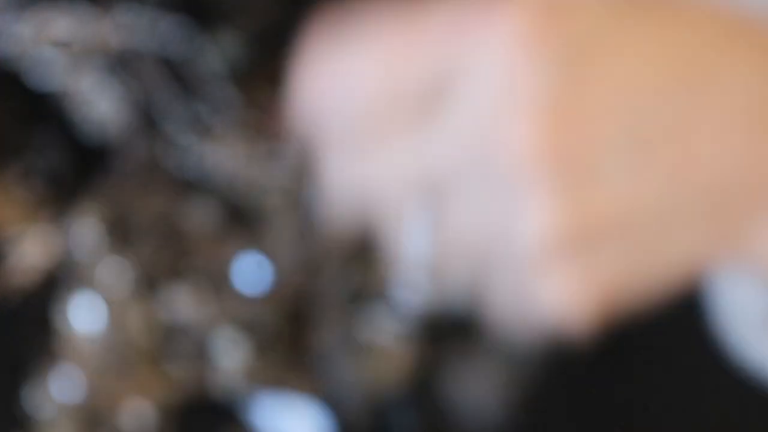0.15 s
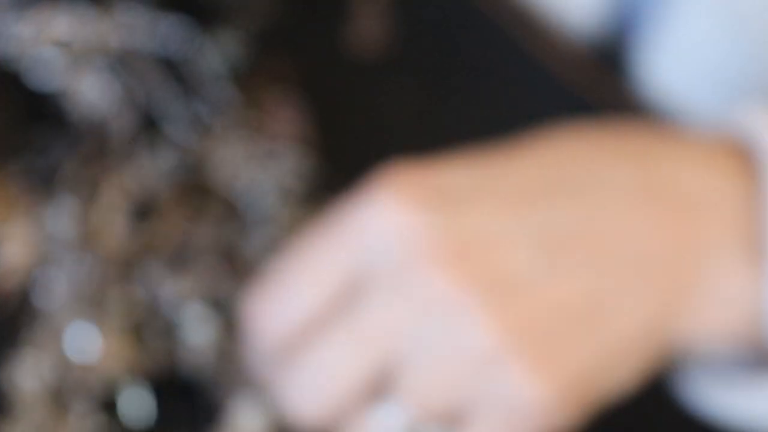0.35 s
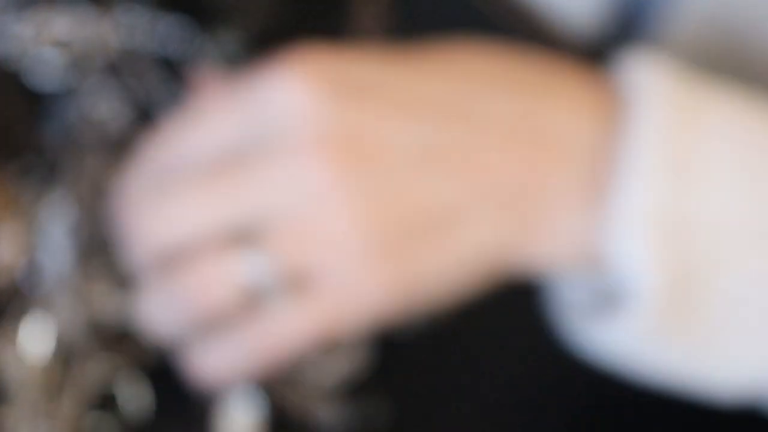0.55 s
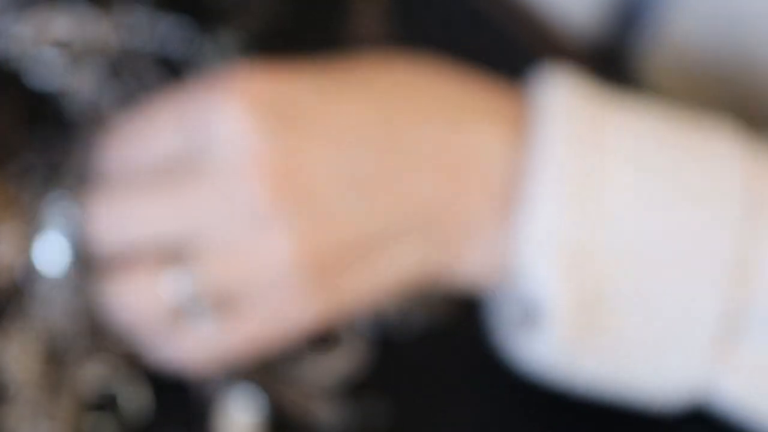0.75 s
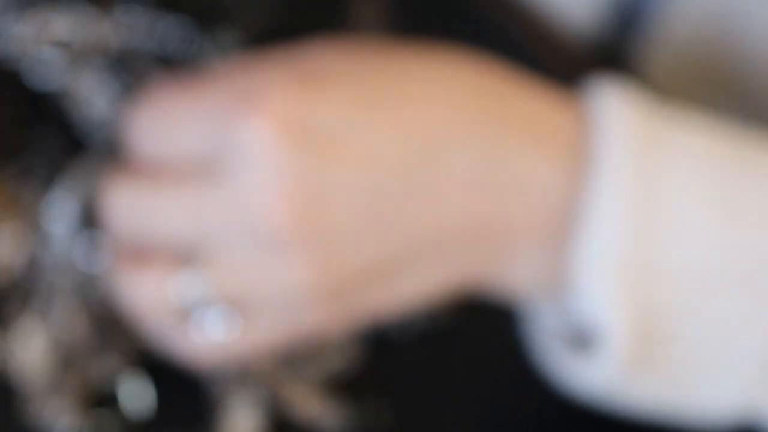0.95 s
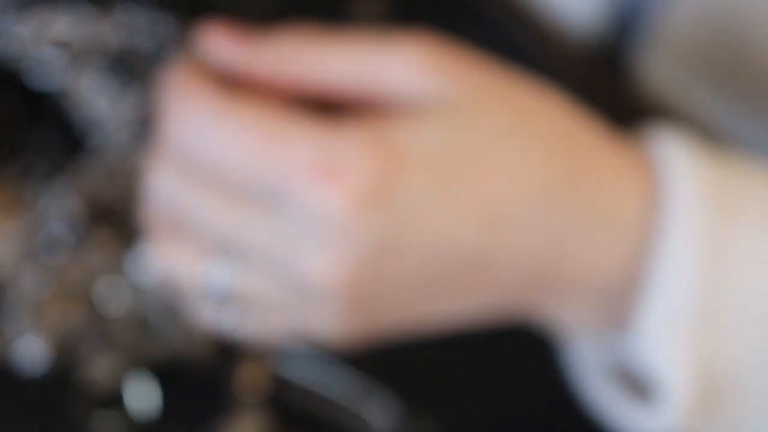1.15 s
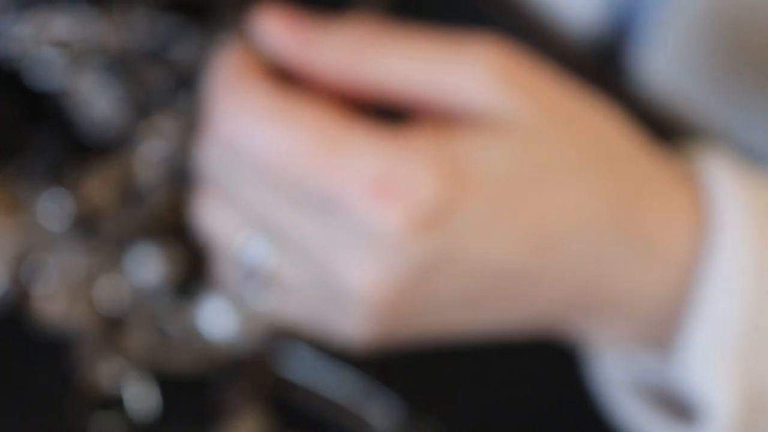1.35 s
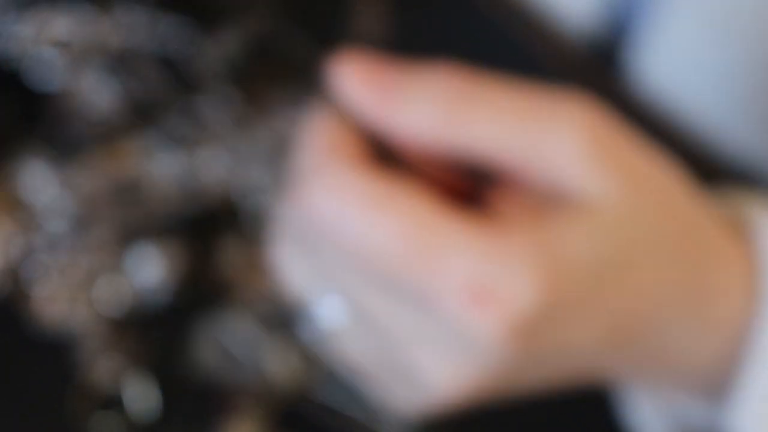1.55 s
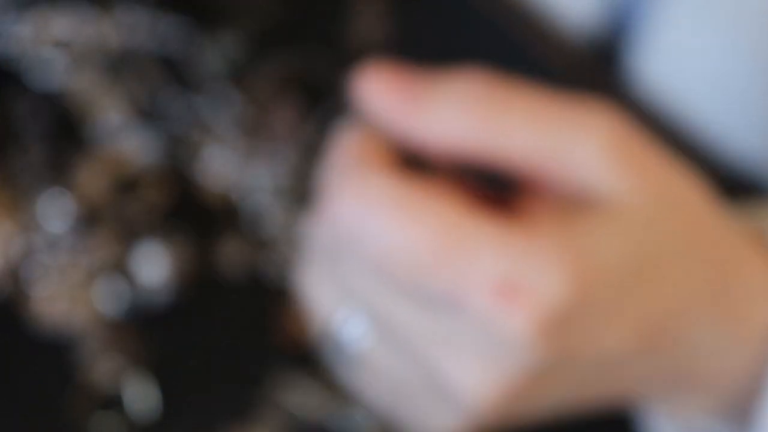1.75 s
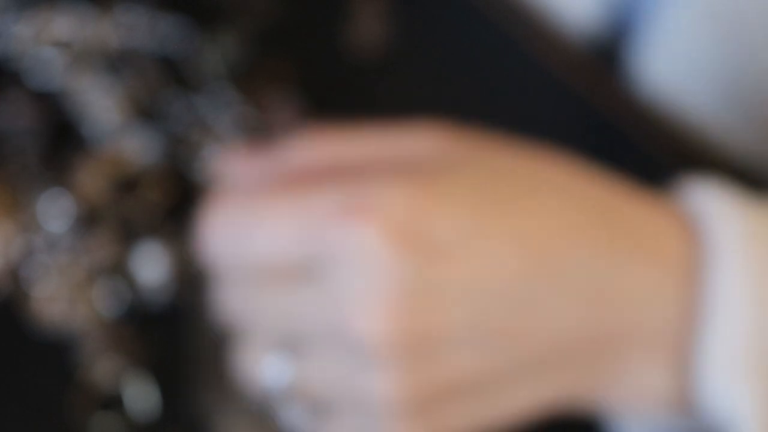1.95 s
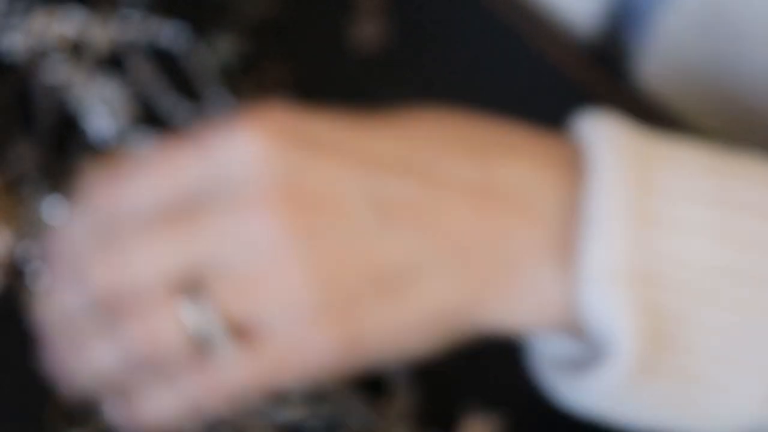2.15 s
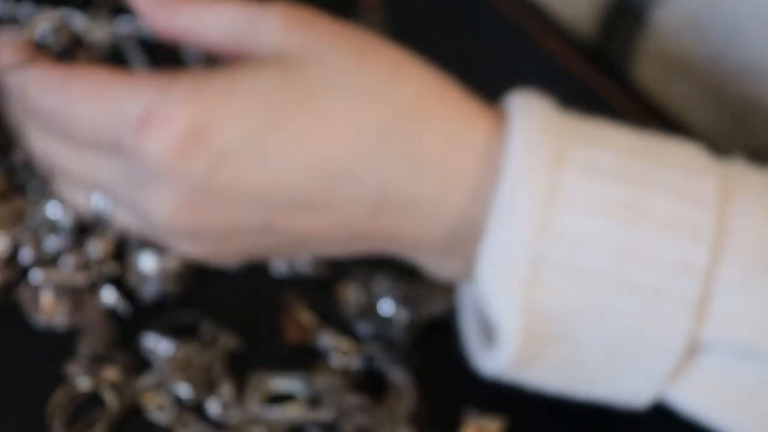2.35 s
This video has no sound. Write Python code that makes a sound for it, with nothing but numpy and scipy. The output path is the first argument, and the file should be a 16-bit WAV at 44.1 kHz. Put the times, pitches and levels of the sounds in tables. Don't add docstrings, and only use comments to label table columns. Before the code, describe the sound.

A hand stirs chains and earrings, bright metallic rattling with dull thuds on a tabletop

```python
import sys
import numpy as np
from scipy import signal
from scipy.fft import rfft, irfft, next_fast_len
from scipy.io import wavfile
from scipy.ndimage import map_coordinates

SR = 44100
rng = np.random.default_rng(int(sys.argv[2]) if len(sys.argv) > 2 else 0)


def waveform_to_disk(signal):
    frames = np.transpose(np.atleast_2d(signal))
    scaled = np.clip(frames, -1, 1) * 32767
    samples = np.round(scaled).astype(np.int16)
    wavfile.write(sys.argv[1], SR, samples)


def convert_level_to_amplitude(level_db):
    exponent = np.asarray(level_db, float) / 20
    return 10 ** exponent


N = 110250

# start_s [s], peak_db [dB], brightness_db [dB]
CLACKS = [(0.046, -33, 13.5), (0.098, -36, 19.5), (0.166, -25.5, 6), (0.203, -11, 7.5),
          (0.3154, -11.5, -15), (0.3413, -5.5, -13), (0.534, -19, 5.5), (0.848, -25, -13),
          (0.8635, -26, -21), (0.967, -26.5, -5), (1.037, -21.5, 0), (1.0652, -14.5, -12),
          (1.1707, -32, -16), (1.1955, -7, -3), (1.3004, -15, -7), (1.4149, -25.5, 5), (1.5374, -46, -15),
          (1.6178, -23, -8), (1.6771, -10, 2), (1.6808, -7, -4), (1.7462, -9.5, -13), (1.8152, -33, 10),
          (1.858, -35, -26), (1.9722, -15, 2), (2.0007, -11, 1), (2.0345, -6, -32), (2.0892, -33, -19),
          (2.1016, -12, -32), (2.1172, -3, -30), (2.2356, -9, 1)]
# start_s [s], peak_db [dB], hardness_hz [Hz]
KNOCKS = [(0.2386, -2.5, 1780), (0.2759, -4, 1660), (0.343, -9, 2500), (0.383, -17.5, 2500),
          (0.761, -34.5, 2970), (1.147, -27.5, 1010), (1.171, -17, 910), (1.525, -31.5, 900),
          (1.974, -27, 516), (2.035, -26, 890), (1.69, -49, 2000)]
# frequency_hz [Hz], density_db [dB per Hz]
LINK_COLOUR = [(710, -13.5), (1200, -11), (1720, -25.5), (1950, -3), (5590, -7.5), (8350, -2.5),
               (14500, -13.5), (16000, -3)]

LAG_S, PAN_DB, TOP_LAG_S = 0.0001, 4, 0.00006
CLATTER_TOP_HZ = 3120


def unit(x):
    return x / np.sqrt(np.mean(x ** 2) + 1e-20)


def along(points, hz):
    f, v = np.transpose(points)
    return np.interp(np.log(hz + 1), np.log(f + 1), v)


def wobble(rate):
    knots = rng.standard_normal(int(N * rate / SR) + 4)
    return map_coordinates(knots, [np.arange(N) * rate / SR])


def filtered(x, response):
    m = next_fast_len(N + SR // 2)
    return irfft(rfft(x, m) * response(np.fft.rfftfreq(m, 1 / SR)), m)[..., :N]


def causal(points):
    def response(hz):
        cepstrum = irfft(np.log(convert_level_to_amplitude(along(points, hz)) + 1e-6))
        half = len(cepstrum) // 2
        cepstrum[1:half] *= 2
        cepstrum[half + 1:] = 0
        return np.exp(rfft(cepstrum))
    return response


def pings(s, hz, db, t60, lag_s, size, pan_db=PAN_DB):
    t = np.arange(size) / SR
    place = rng.standard_normal((len(s), 2))
    out = []
    for side in (-0.5, 0.5):
        at = (s + side * lag_s * place[:, 0]) * SR
        age = np.maximum(t - (at % 1)[:, None] / SR, 0)
        level_db = (db + side * pan_db * place[:, 1])[:, None] - 60 * age / t60[:, None]
        wave = convert_level_to_amplitude(level_db) * np.sin(2 * np.pi * hz[:, None] * age)
        i = np.clip(np.floor(at).astype(int)[:, None] + np.arange(size), 0, N)
        out.append(np.bincount(i.ravel(), wave.ravel(), N + 1)[:N])
    return np.array(out)


def contacts(count, spread_db, lag_s):
    d = rng.random((count, 2))
    one = np.ones(count)
    size_db = spread_db * np.minimum(-np.log(d[:, 1]), 4)
    pan_db = PAN_DB * (lag_s / LAG_S) ** 2
    clicks = pings(d[:, 0] * N / SR, one * SR / 4, size_db, one * 3 / SR, lag_s, size=4, pan_db=pan_db)
    return unit(clicks)


def air():
    # frequency_hz [Hz], density_db [dB per Hz]
    air_colour = [(15, -66), (25, -42), (64, -11), (117, -4.5), (427, -11.5), (503, -6.5), (3340, -18),
                  (6210, -18), (16000, -25)]
    a, b = rng.standard_normal((2, N))
    pair = np.array([a + 0.93 * b, a - 1.18 * b])
    tone = unit(filtered(pair, lambda f: convert_level_to_amplitude(along(air_colour, f))))
    hiss = rng.standard_normal((2, N))
    rumble = unit(filtered(hiss, lambda f: f / (15 + f) / (1 + (f / 50) ** 3)))
    return convert_level_to_amplitude(-53.5) * (tone + convert_level_to_amplitude(-22) * rumble)


def room(x):
    # frequency_hz [Hz], t60_s [s]
    room_decay = [(200, 0.26), (2000, 0.28), (12000, 0.15)]
    hz, t, z = signal.stft(rng.standard_normal((2, SR // 3)), SR, nperseg=256)
    share = (1 / (1 + (hz / 1200) ** 2))[:, None]
    z = np.array([z[0], share * z[0] + np.sqrt(1 - share ** 2) * z[1]])
    decay = convert_level_to_amplitude(-60 * t / along(room_decay, hz)[:, None])
    tail = signal.istft(z * decay, SR, nperseg=256)[1]
    late = np.pad(x.mean(0), (130, 0))[None]
    return signal.fftconvolve(late, tail / np.linalg.norm(tail[0]), axes=1)[:, :N]


def table(force):
    # frequency_hz [Hz], density_db [dB per Hz]
    top_colour = [(24, -69), (40, -28), (155, -4), (362, -5.5), (470, 2.5), (587, -4), (973, -3.5),
                  (1290, -8.5), (5000, -18), (6500, -22.5), (11000, -120)]
    # pitch_hz [Hz], width_hz [Hz], level_db [dB]
    top_modes = [(163.7, 12.7, 9), (206, 28, -5.5), (299, 50, 4.5), (464, 21, -3), (498, 28.5, 5),
                 (975, 106, 3), (1363, 215, 2.5), (2000, 400, -11.5)]
    colour = causal(top_colour)

    def response(f):
        modes = 1
        for centre, width, db in top_modes:
            modes = modes + convert_level_to_amplitude(db) * 1j * f * width / (centre * centre - f * f + 1j * f * width)
        return colour(f) * modes
    return filtered(force, response)


def thumps():
    # start_s [s], peak_db [dB], pitch_hz [Hz]
    thump_hits = [(0.202, -31, 526), (0.237, -22, 501), (0.275, -23.5, 500), (1.037, -37.5, 499),
                  (1.088, -33, 530), (1.136, -34, 524), (1.166, -28, 493), (1.207, -28, 481),
                  (1.239, -33.5, 508), (1.292, -39, 531), (1.708, -32.5, 514), (1.784, -35, 473),
                  (1.972, -27, 482.6), (1.984, -31, 501), (1.998, -27.5, 461), (2.035, -28.5, 490),
                  (2.079, -44, 460), (2.121, -28.5, 502)]
    s, db, hz = np.transpose(thump_hits)
    one = np.ones(len(s))
    boom = pings(s, 162.7 * one, db - 4.5, 0.14 * one, TOP_LAG_S, size=9000, pan_db=-2.0)
    return boom + pings(s, hz, db, 0.097 * one, TOP_LAG_S, size=5000, pan_db=-1.0)


def knocks():
    double_s = 0.0019
    s, db, hz = np.tile(np.transpose(KNOCKS), 2)
    s = s + double_s * (np.arange(len(s)) >= len(KNOCKS))
    blows = pings(s, hz, db + 3, 2.15 / hz, TOP_LAG_S / 2, size=200, pan_db=3)

    def soft(f):
        ratio = f / CLATTER_TOP_HZ
        return 1 / (1 - ratio ** 2 + 1.3j * ratio) ** 2
    return filtered(blows + convert_level_to_amplitude(-18) * table(blows), soft)


def pendants():
    # start_s [s], pitch_hz [Hz], level_db [dB], t60_s [s]
    pendant_rings = [(.077, 7360, -46, .1), (.105, 13390, -54, .1), (.2035, 7359, -14, .05),
                     (.243, 13400, -35, .2), (.27, 13400, -37, .12), (.44, 14900, -41, .1),
                     (.517, 6935, -31, .14), (.537, 13270, -36, .08), (.712, 6935, -45, .2),
                     (1.075, 8100, -35, .06), (1.101, 10085, -28, .08), (1.3, 6935, -36, .14),
                     (1.416, 7390, -34, .05), (1.464, 8620, -43, .08), (1.538, 7390, -43, .05),
                     (1.619, 7350, -36, .12), (1.62, 11110, -45, .15), (1.62, 9740, -47, .15),
                     (1.652, 7350, -28, .04), (1.663, 11780, -31, .4), (1.68, 12030, -27, .25),
                     (1.755, 11800, -42, .15), (1.808, 12750, -36, .1), (1.865, 14900, -47, .12),
                     (2.034, 8500, -23, .03), (2.045, 8600, -30, .07), (1.6803, 3700, -8, .005),
                     (2.2362, 3050, -26, .012), (.663, 6935, -55, .15), (.83, 6930, -48, .06),
                     (.544, 7600, -36, .03), (1.558, 10000, -47, .06), (1.578, 10000, -46, .05),
                     (1.235, 10000, -39, .1), (1.125, 13300, -43, .12), (1.485, 8700, -42, .05)]
    s, hz, db, t60 = np.transpose(pendant_rings)
    return pings(s, hz, db, t60, 0.000015, size=12000, pan_db=7)


def snaps():
    # start_s [s], peak_db [dB]
    snap_hits = [(0.0319, -39), (0.0471, -33), (0.0993, -30), (0.1675, -29), (0.186, -30), (0.2033, -7),
                 (0.2388, -9), (0.2776, -8), (0.3262, -18), (0.3418, -12), (0.3481, -13), (0.3592, -14),
                 (0.3895, -16), (0.4795, -21), (0.4997, -23), (0.5366, -20), (0.6398, -38), (0.7621, -36),
                 (0.8484, -29), (0.8633, -28), (0.91, -37), (1.0378, -26), (1.0779, -22), (1.0886, -24),
                 (1.1365, -25), (1.1497, -24), (1.1964, -16), (1.2757, -25), (1.3011, -18), (1.3337, -26),
                 (1.4167, -25), (1.5054, -32), (1.5261, -28), (1.5893, -27), (1.6198, -25), (1.6802, -4),
                 (1.7082, -16), (1.7274, -18), (1.7354, -21), (1.7455, -15), (1.7541, -17), (1.7592, -17),
                 (1.7724, -19), (1.787, -21), (1.816, -22), (1.8326, -25), (1.8396, -25), (1.8864, -25),
                 (1.9188, -28), (1.9687, -21), (1.9845, -19), (2.0354, -11), (2.0904, -21), (2.1034, -15),
                 (2.108, -17), (2.1173, -10), (2.1271, -14), (2.2378, -15)]
    mirror_s, mirror_db = 0.00018, -8
    s, db = np.transpose(snap_hits)
    one = np.ones(len(s))
    d = rng.random((len(s), 2, 4))
    push = pings(s, one * 5200, db + 5.5, one * 0.0005, 0.00002, size=40, pan_db=1)
    after_s = (s[:, None] + 0.0025 * d[:, 0]).ravel()
    after_hz = 2000 * 5 ** d[:, 1].ravel()
    after_db = np.repeat(db - 18, 4)
    after = pings(after_s, after_hz, after_db, np.full(len(after_s), 0.005), LAG_S, size=300)
    mirrored = filtered(push, lambda f: 1 - convert_level_to_amplitude(mirror_db) * np.exp(-2j * np.pi * f * mirror_s))
    return mirrored + after


def clacks():
    s, peak, bright = np.transpose(CLACKS)
    d = rng.random((len(s), 3, 12))
    hz = 1800 * (15000 / 1800) ** ((np.arange(12) + d[:, 0]) / 12)
    tilt_db = 0.58 * (bright + 8)[:, None] * np.log2(hz / 4000).clip(0)
    db = (peak - 8 - 18.0)[:, None] + tilt_db + 6 * d[:, 1]
    mode_s = s[:, None] + 0.0013 * d[:, 2] ** 2
    t60 = 0.014 + 15 / hz
    crack = pings(mode_s.ravel(), hz.ravel(), db.ravel(), t60.ravel(), LAG_S, size=800)
    one = np.ones(len(s))
    tap = pings(s, one * 2000, peak - 9, one * 0.0004, TOP_LAG_S, size=80)
    return crack + table(tap)


def stirring():
    # start_s [s], strength_db [dB], finest_links_db [dB]
    stir_moves = [(0, -52.5, 2), (.19, -49.5, 1), (.3, -33.5, 0), (.37, -19.5, -9.5), (0.539, -30, -7),
                  (.63, -56.5, -1), (1.0, -47, -10), (1.07, -37.5, 1.5), (1.22, -27.5, -4), (1.39, -44, -1),
                  (1.49, -46, 9.5), (1.575, -42.5, -3.5), (1.76, -27.5, -2.5), (1.92, -34, -6),
                  (2.02, -29, 2), (2.135, -25, -12), (2.195, -42, 5), (2.33, -63, -20)]
    # start_s [s], weight_db [dB]
    press_moves = [(0.0, -49.5), (0.19, -37), (0.24, -24), (0.33, -41.5), (0.35, -27), (0.69, -54),
                   (0.97, -46), (1.2, -30), (1.38, -47.5), (1.66, -40.5), (1.68, -36.5), (1.92, -41.5),
                   (1.98, -29.5), (2.14, -40), (2.21, -63), (2.24, -35.5), (2.32, -73), (2.5, -64)]
    t = np.arange(N) / SR
    s, db, fine_db = np.transpose(stir_moves)
    clump = 2.5 * wobble(30.48)
    level = convert_level_to_amplitude(np.interp(t, s, db) - 2 + clump + 0.94 * wobble(60))
    press_db = np.interp(t, *np.transpose(press_moves))
    heavy = convert_level_to_amplitude(press_db - 2 + 0.13 * clump + 1.2 * wobble(25.21))

    def dying(at, db, t60):
        return (t > at) * convert_level_to_amplitude(db - 60 * np.abs(t - at) / t60)
    for at, peak, _ in CLACKS:
        level = np.hypot(level, dying(at, peak - 14, 0.16))
    rattle = np.sqrt(sum(dying(at, peak - 11.5, 0.067) ** 2 for at, peak, _ in KNOCKS))
    return level, convert_level_to_amplitude(np.interp(t, s, fine_db)), heavy, rattle


def grains(count, spread_db, cycles):
    d = rng.random((count, 4))
    hz = 1500 * (16000 / 1500) ** d[:, 1]
    size_db = spread_db * np.minimum(-np.log(d[:, 2]), 3.5)
    db = size_db + along(LINK_COLOUR, hz) + 20 * np.log10(hz / 4000)
    t60 = cycles * (0.5 + d[:, 3]) / hz
    return unit(pings(d[:, 0] * N / SR, hz, db, t60, LAG_S, size=160))


def tinkling(level):
    d = rng.random((700, 4))
    hz = 4000 * (15000 / 4000) ** d[:, 1]
    s = d[:, 0] * N / SR
    stir_db = 20 * np.log10(level[(s * SR).astype(int)])
    db = stir_db + 2.0 * np.minimum(-np.log(d[:, 2]), 2.5) - 10
    return pings(s, hz, db, 0.0062 + 0.065 * d[:, 3] ** 2, LAG_S, size=2000)


def drumming(heavy, rattle):
    force = contacts(count=6000, spread_db=2.5, lag_s=TOP_LAG_S)
    return table(force * (heavy + 0.35 * rattle)) / np.std(table(force))


def clattering(rattle):
    def band(f):
        ratio = f / CLATTER_TOP_HZ
        return 1j * f / (1020 + 1j * f) / (1 - ratio ** 2 + 1.2j * ratio) ** 3
    beads = contacts(count=14000, spread_db=2.5, lag_s=LAG_S)
    return filtered(beads * rattle, band) / np.std(filtered(beads, band))


def chains():
    level, fine, heavy, rattle = stirring()
    ticks = contacts(count=12000, spread_db=3, lag_s=LAG_S)
    ticks = unit(filtered(ticks, causal(LINK_COLOUR)))
    links = convert_level_to_amplitude(-8.5) * ticks + convert_level_to_amplitude(-2.5) * grains(count=12000, spread_db=4.5, cycles=12.5)
    finest = filtered(links, lambda f: 1 / (1 + (7300 / (f + 1)) ** 6))
    shower = level * (links + (fine - 1) * finest)
    return shower + tinkling(level) + drumming(heavy, rattle) + clattering(rattle)


def scene():
    metal = chains() + clacks() + knocks() + snaps() + thumps()
    rings = pendants()
    wet = convert_level_to_amplitude(-5) * room(metal + 0.5 * rings)
    low_cut_hz = 94.6
    close = filtered(metal + rings + wet, lambda f: (1j * f / (low_cut_hz + 1j * f)) ** 4)
    return close + air()


def low_pass(x):
    return signal.sosfilt(signal.butter(12, 17010, fs=SR, output="sos"), x)


def record(dry):
    mix = filtered(dry, lambda hz: hz < 15900)
    return low_pass(mix)


dry = scene()
out = record(dry)
waveform_to_disk(out)
```